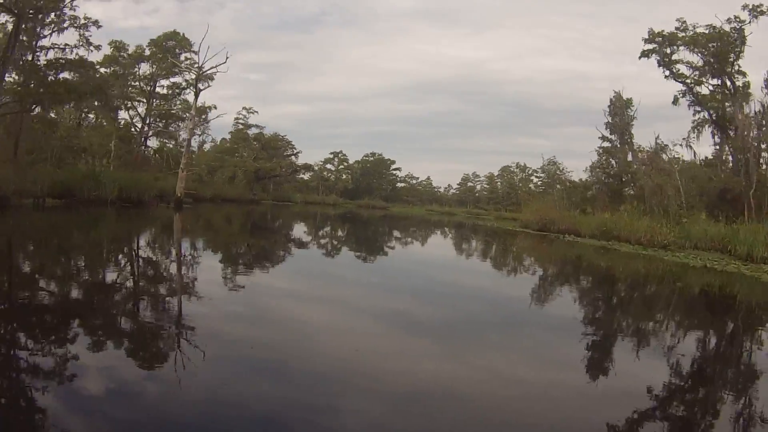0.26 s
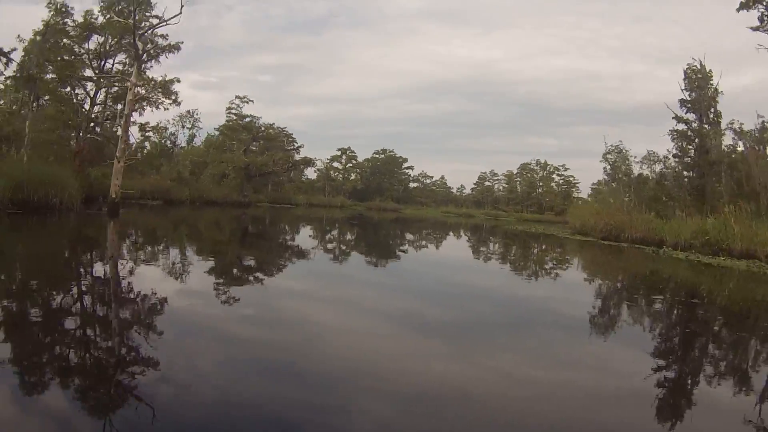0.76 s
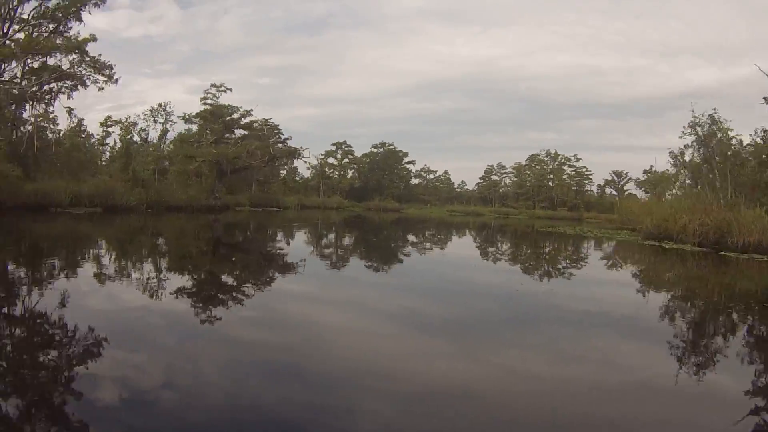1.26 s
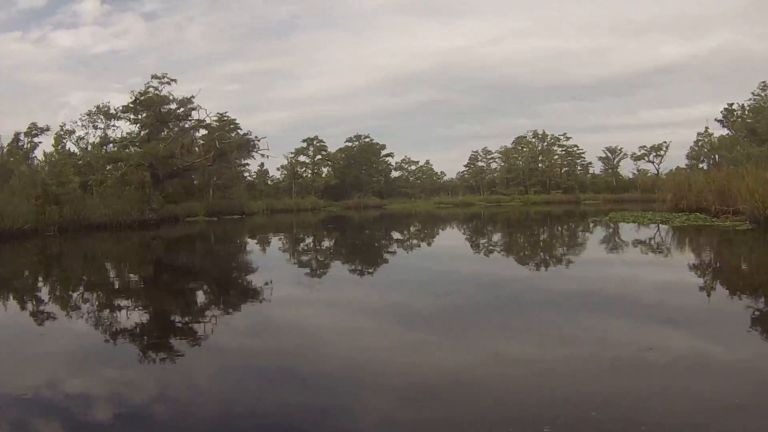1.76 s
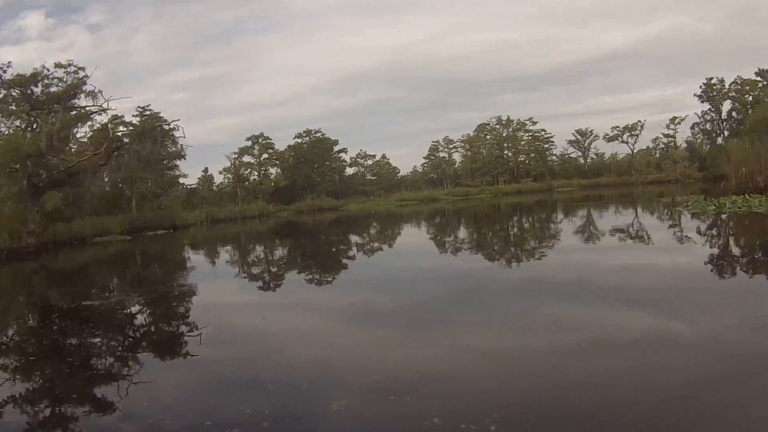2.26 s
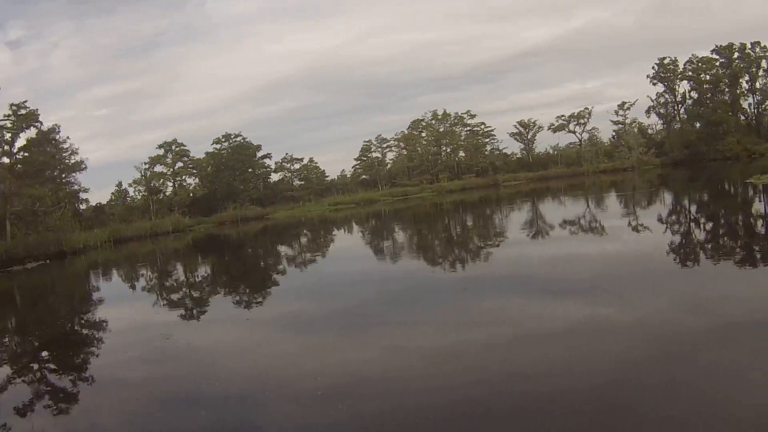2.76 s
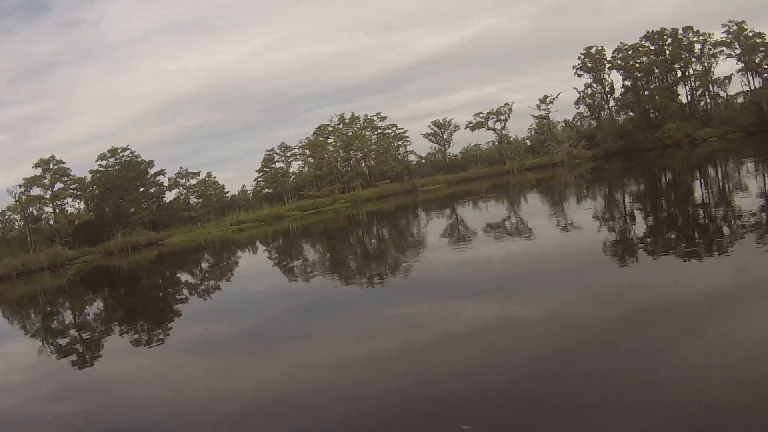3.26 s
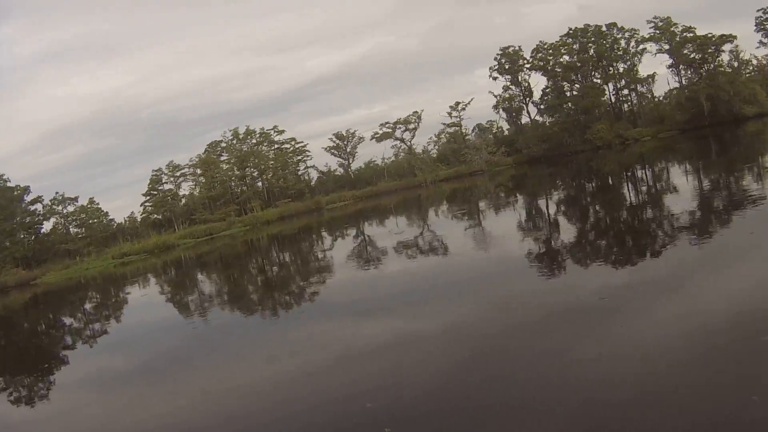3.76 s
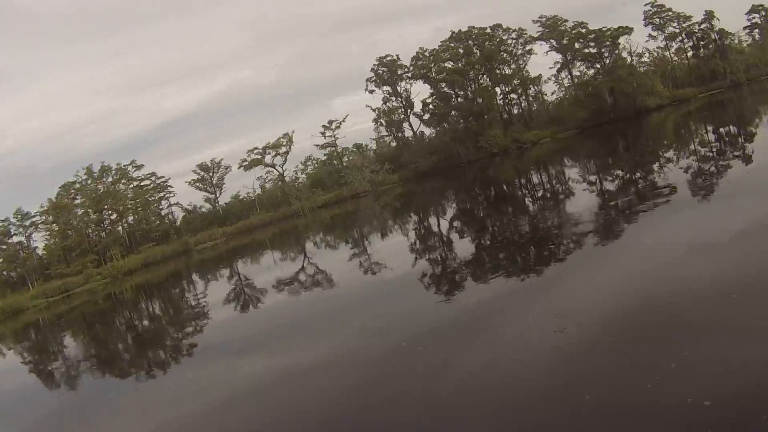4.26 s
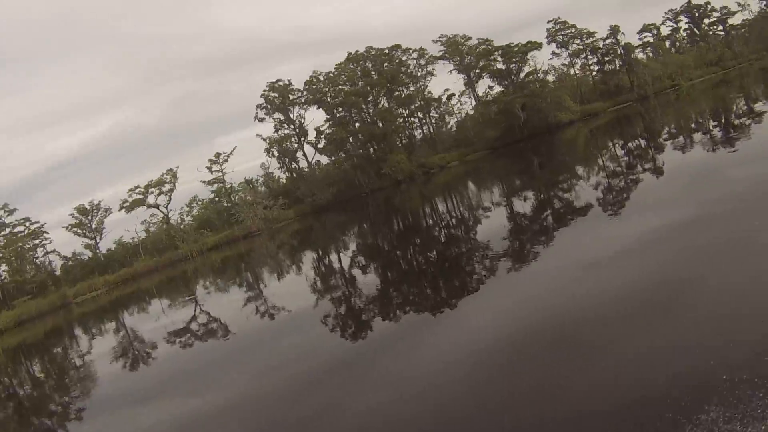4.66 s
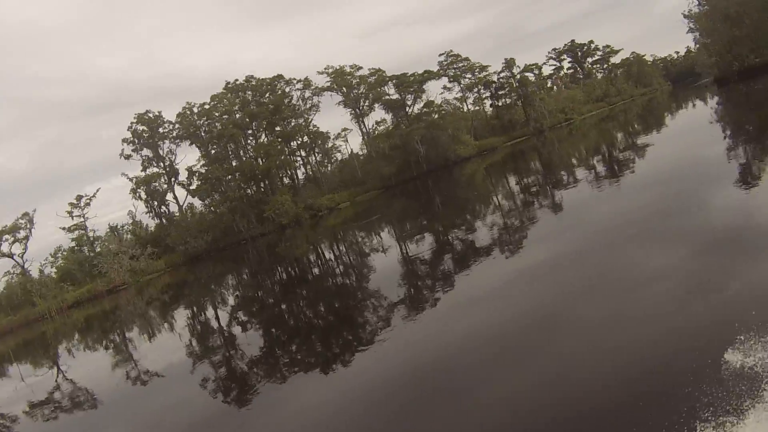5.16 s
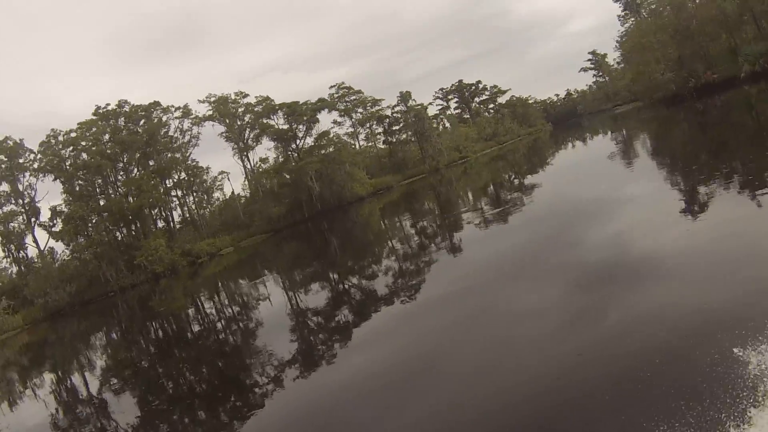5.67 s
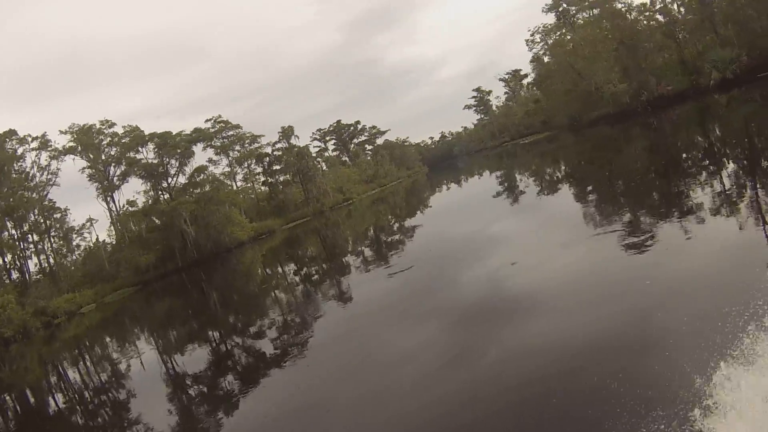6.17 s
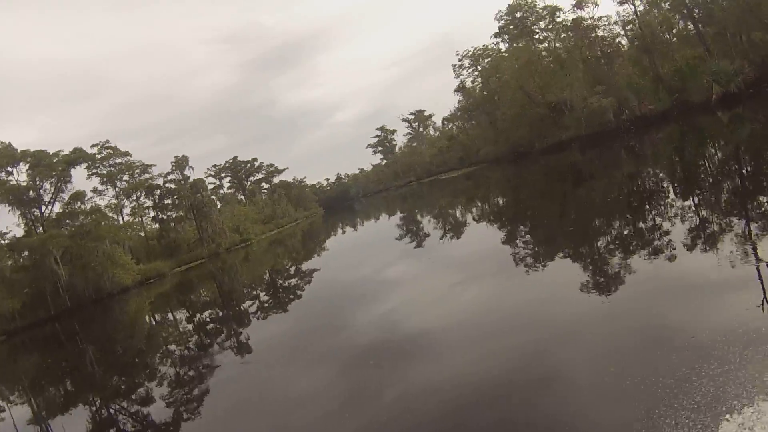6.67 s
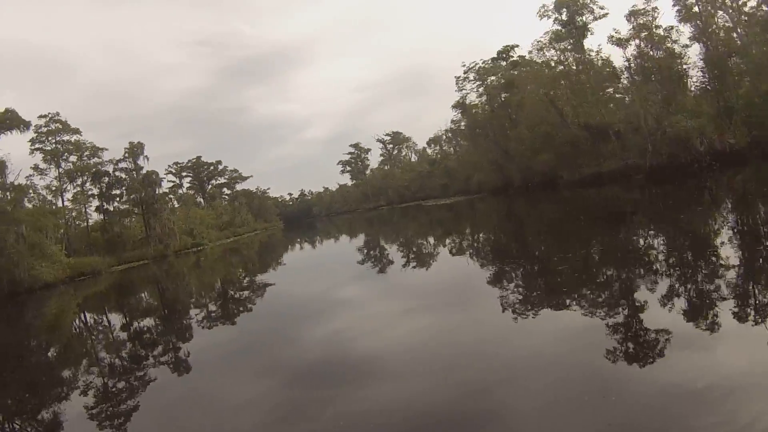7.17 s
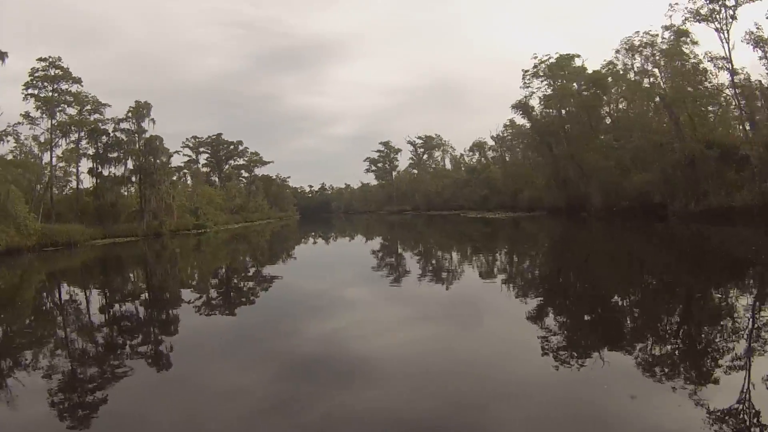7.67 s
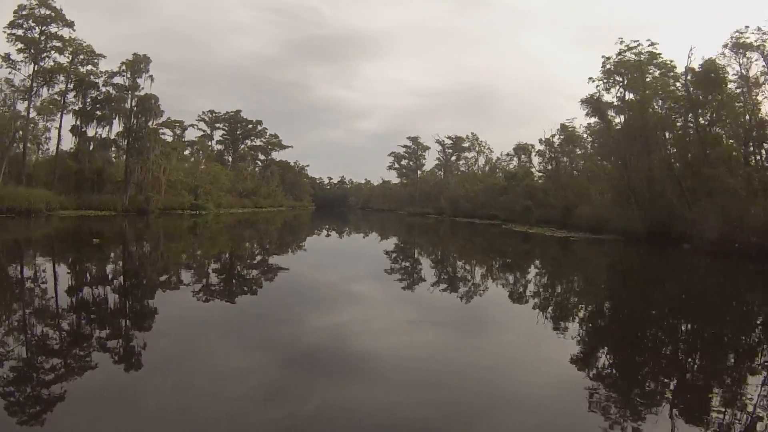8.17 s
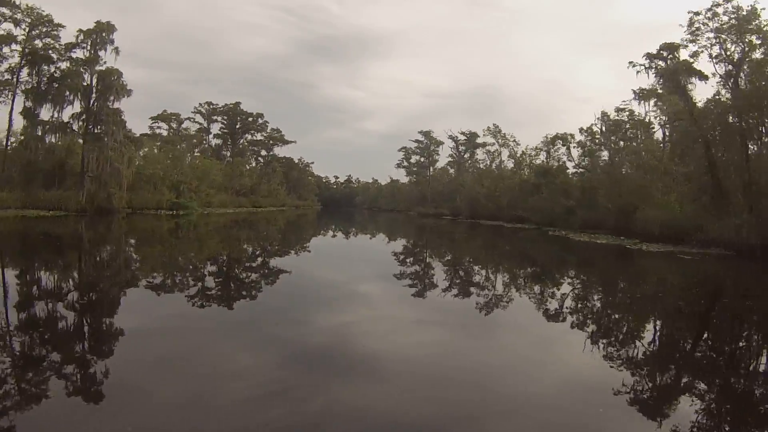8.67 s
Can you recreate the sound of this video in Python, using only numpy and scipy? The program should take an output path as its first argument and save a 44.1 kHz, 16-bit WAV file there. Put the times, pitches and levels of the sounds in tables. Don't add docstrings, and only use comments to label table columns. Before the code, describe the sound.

Close, boxy, muffled sound aboard a small open boat on calm water: a deep, throbbing outboard hum at nearly constant speed, slightly uneven, with a nasal mid-range rattle. Low water rush and light slaps run underneath. Fine hiss and spray build through a turn, strongest halfway, while sharp raps hit the cowl; later the water thins and faint high buzzes return.

```python
import sys
import numpy as np
from scipy import signal
from scipy.fft import rfft, irfft, next_fast_len
from scipy.io import wavfile
from scipy.ndimage import uniform_filter1d, minimum_filter1d

SR = 44100
rng = np.random.default_rng(int(sys.argv[2]) if len(sys.argv) > 2 else 0)


def generate_wav(sig):
    pcm = np.round(np.clip(np.atleast_2d(sig).T, -1, 1) * 32767).astype(np.int16)
    wavfile.write(sys.argv[1], SR, pcm)


def nominal_scale(level):
    x = np.asarray(level, float) / 20
    return 10 ** x


N = 393372
TIME = np.arange(N) / SR


def rms_one(x):
    return x / np.sqrt(np.mean(x ** 2) + 1e-20)


def in_time(rows):
    seconds, *columns = np.transpose(rows)
    return [np.interp(TIME, seconds, column) for column in columns]


def around(s, reach_s):
    return slice(max(int((s - reach_s) * SR), 0), int((s + reach_s) * SR))


def present(start, stop, fade_s, offset):
    return np.clip(np.minimum(TIME - start, stop - TIME) / fade_s + offset, 0, 1)


def drift(rate_hz):
    r = np.exp(-80 * np.pi * rate_hz / SR)
    draws = rng.standard_normal(N // 40 + 2002)
    slow = signal.lfilter([1], [1, -2 * r, r * r], draws)[2000:]
    return np.interp(np.arange(N) / 40, np.arange(len(slow)), rms_one(slow))


def colour(x, points):
    hz, level_db = np.transpose(points)
    size = next_fast_len(N)
    log_hz = np.log(np.arange(size // 2 + 1) * SR / size + 1)
    gain = nominal_scale(np.interp(log_hz, np.log(hz), level_db, left=-90, right=-120))
    return rms_one(irfft(rfft(x, size) * gain, size)[:N])


def resonate(x, hz, width_hz):
    r = np.exp(-np.pi * width_hz / SR)
    section = [(1 - r * r) / 2, 0, (r * r - 1) / 2, 1, -2 * r * np.cos(2 * np.pi * hz / SR), r * r]
    return signal.sosfilt([section, section], x + 1e-18)


def shaken(cycles, gate_db, grain_db):
    beat = np.cos(2 * np.pi * (cycles - .4)) + 0.27 * np.cos(np.pi * cycles) + 0.14 * np.cos(4 * np.pi * cycles)
    return rng.standard_normal(N) * nominal_scale(gate_db * beat + grain_db * drift(45))


def drone(cycles, level_db):
    # time in seconds, loss in dB, length in ms, phase slip in cycles.
    stumbles = [(0.051, 12, 36, 0.041), (0.206, 9, 40, 0.27), (0.498, 3.5, 75, -0.092),
                (0.975, 7.5, 38, 0.23), (1.504, 7, 38, 0.16), (1.666, 5, 31, 0.099), (1.118, 0.5, 55, 0.25),
                (2.118, 1, 115, -0.067), (2.467, 11, 55, 0.23), (2.666, 8, 32, 0.1), (2.821, 8, 35, 0.29),
                (2.949, 3.5, 93, -0.08), (3.197, 4.5, 45, -0.055), (3.465, 2, 56, 0.18),
                (4.922, 6, 26, -0.12), (4.488, 0.5, 20, -0.51), (4.603, 6.8, 20, 0.36),
                (4.729, 17, 24, 0.047), (5.103, 6, 25, -0.09), (5.39, 17.5, 16, 0.082),
                (5.8, 7.5, 54, 0.15), (6.307, 4, 57, 0.094), (6.607, 8, 35, -0.21), (6.95, 6, 29, 0.16),
                (7.192, 12, 23, -0.0078), (8.008, 18, 34, -0.1), (8.132, 9, 38, 0.14),
                (8.26, 3, 50, -0.097), (8.422, 13, 45, 0.12), (8.684, 4, 45, -0.015)]
    loss_db, slip = np.zeros(N), np.zeros(N)
    for s, depth_db, ms, turns in stumbles:
        near = around(s, reach_s=.2)
        late = (TIME[near] - s) / (max(ms, 5) / 1000)
        shape = np.exp(-(late / np.where(late < 0, .75, .45)) ** 2)
        loss_db[near] += depth_db * shape
        slip[near] += turns * shape / shape.sum()
    relax = np.exp(-1 / (.25 * SR))
    ahead = signal.lfilter([1], [1, -relax], slip) + 0.016 * drift(9)
    slight_db = 1.1 * np.maximum(drift(11), 0) ** 2
    height = np.sqrt(2) * nominal_scale(level_db - loss_db - slight_db + .75 * drift(1))
    return height * np.sin(2 * np.pi * (cycles + ahead))


def swelling(resting_db, spells):
    height = nominal_scale(resting_db)
    for start, stop, db in spells:
        height = height + nominal_scale(db) * present(start, stop, fade_s=.17, offset=.5)
    return height


def orders(cycles):
    # multiple of the firing rate, level in dB.
    steady_orders = [(.5, -47), (1.5, -41), (4, -44.5), (5, -52), (7, -50), (11, -46), (16, -52)]
    gear_orders = (2, 3, 6, 8, 9, 12)
    resting_levels = (-36, -33.5, -51, -44.5, -50, -45)
    # from and to in seconds, added dB.
    panel_spells = [
        [(1.6, 4.4, -37), (4.4, 7.9, -34)],
        [(.5, .72, -27), (1.1, 2.05, -31.5), (2.05, 2.35, -19), (2.35, 3.3, -22), (3.3, 4.25, -28),
         (6.0, 7.1, -35.5), (7.45, 7.95, -24.5), (7.95, 9.5, -19)],
        [(-1, 2.48, -44.5), (4.5, 5.8, -47), (7, 9.5, -46)],
        [(3.3, 4.5, -59), (4.5, 7.2, -39.5), (7.8, 9.5, -44.5)],
        [(-1, 0.87, -52), (-1, 1.1, -40.5), (2, 5.2, -35), (5, 7.8, -41.5)],
        [(1.5, 0.79, -41), (3, 4.8, -34), (5, 5.8, -26), (7, 9.5, -35)],
    ]
    heights = [(k, nominal_scale(db)) for k, db in steady_orders]
    for k, resting_db, spells in zip(gear_orders, resting_levels, panel_spells):
        heights.append((k, swelling(resting_db, spells)))
    uneven = .004 * drift(6)
    out = np.zeros(N)
    for k, height in heights:
        waver_db = np.sqrt(k) * .45 * drift(8.3)
        tone = np.sin(2 * np.pi * (k * (cycles + uneven) + rng.random()))
        out += np.sqrt(2) * height * nominal_scale(waver_db) * tone
    return out


def cowl(cycles, strain, slap_db):
    # frequency in Hz, density in dB per Hz.
    rattle_spectrum = [(400, -21.5), (545, -17.5), (600, -10), (655, -11.5), (700, -10), (776, -3.5),
                       (903, -6), (1000, -5.5), (1100, -4.5), (1220, -18), (1390, -13.5), (1900, -18.5),
                       (2370, -24.5), (3000, -28.5)]
    # frequency in Hz, width in Hz, level in dB.
    panel_modes = [(771.8, 70, -8.5), (820.5, 49, -7), (893.3, 30, -8.5), (953.3, 39, -7.5), (988, 53, -1),
                   (1068.5, 61, -8), (1386, 78, -20.5), (1925, 100, -22)]
    shake = shaken(cycles, gate_db=2.1, grain_db=0.77)
    panels = np.zeros(N)
    for hz, width_hz, db in panel_modes:
        panels += nominal_scale(db + 1.4 * drift(1.1)) * rms_one(resonate(shake, hz, width_hz))
    rattle = colour(shaken(cycles, gate_db=0.5, grain_db=0.5), rattle_spectrum)
    level_db = -26 + 5.5 * strain + slap_db + 0.89 * drift(10)
    return nominal_scale(level_db) * rms_one(rattle * nominal_scale(-0.5) + panels)


def rush(wet, strain, slap_db):
    # frequency in Hz, density in dB per Hz.
    rush_spectrum = [(22, -29.5), (42, -11), (55, -6), (72, 8.5), (100, 4), (135, 1.5), (190, -2.5),
                     (245, 2.5), (280, -4.5), (305, -9.5), (380, -14), (510, -13.5), (545, -27),
                     (700, -51.5)]
    surging = rng.standard_normal(N) * nominal_scale(2.3 * drift(3.7))
    level_db = -25.5 + 1.5 * strain + 0.5 * wet + 0.96 * slap_db
    return nominal_scale(level_db) * colour(surging, rush_spectrum)


def spray(cycles, wet, slap_db):
    # frequency in Hz, density in dB per Hz.
    spray_spectrum = [(2000, -30), (2450, -19), (2700, -15), (3160, -2.5), (3480, -8), (3770, -4.5),
                      (3940, -8.5), (4250, -18.5), (4700, -31)]
    level_db = -44.5 + 12.5 * wet + 0.9 * slap_db
    return nominal_scale(level_db) * colour(shaken(cycles, gate_db=0.0, grain_db=-1.0), spray_spectrum)


def hiss(cycles, wet, strain, slap_db):
    # frequency in Hz, density in dB per Hz.
    hiss_spectrum = [(4000, -19), (4500, 1), (5100, -5), (5680, 0), (6000, -5), (6500, -3), (6900, -6),
                     (7300, -14), (7950, -6), (8500, -9), (9300, -17), (10700, -11), (11800, -22),
                     (15200, -33)]
    wake_loss_db = 0.42 * TIME
    level_db = -56 + 8.5 * wet + strain - wake_loss_db + 0.93 * slap_db
    return nominal_scale(level_db) * colour(shaken(cycles, gate_db=0.7, grain_db=0.6), hiss_spectrum)


def singing(cycles):
    # frequency in Hz, width in Hz, from and to in seconds, level in dB.
    wall_modes = [
        (6650, 550, -1, 1.75, -59.5),
        (5560, 450, 7.9, 10, -61.5),
    ]
    out = np.zeros(N)
    for hz, width_hz, start, stop, db in wall_modes:
        height = nominal_scale(db + 1.5 * drift(4)) * present(start, stop, fade_s=.3, offset=0)
        out += height * rms_one(resonate(shaken(cycles, gate_db=.6, grain_db=1.2), hz, width_hz))
    return out


def ticks():
    # start in seconds, peak level in dB.
    mount_buzzes = [(0.0802, -62), (0.5856, -55), (0.7203, -61), (1.0201, -57), (1.1189, -60),
                    (1.2126, -64), (1.3204, -60), (1.3917, -60), (1.4202, -61), (1.7654, -59),
                    (2.0398, -58), (2.584, -62), (2.7721, -64), (7.3292, -63), (7.4789, -65), (7.6246, -68),
                    (7.894, -59), (8.0456, -62), (8.1499, -57), (8.2132, -66), (8.2886, -61), (8.3534, -64),
                    (8.4228, -58), (8.4931, -57), (8.5939, -59), (8.6283, -57), (8.7136, -58),
                    (8.7685, -59), (8.8054, -62), (8.8613, -64)]
    gain = np.zeros(N)
    for s, db in mount_buzzes:
        span = slice(int(s * SR), int(s * SR) + 4000)
        late = TIME[span] - s
        gain[span] += nominal_scale(db - 3) * np.exp(-late / .016) * (1 - np.exp(-late / .003))
    band = signal.butter(3, [12300, 14400], "band", fs=SR, output="sos")
    return gain * rms_one(signal.sosfilt(band, rng.standard_normal(N)))


def slaps():
    # centre in seconds, lift in dB, length in ms.
    hull_slaps = [(0.171, 1.5, 160), (.5, 3, 34), (0.596, 5.5, 58), (1.019, 6, 30), (1.18, 2, 57),
                  (1.32, 3, 27), (1.57, 5, 50), (1.72, 4.5, 74), (2.2, 3.5, 90), (2.518, 2.5, 43),
                  (2.689, 3.5, 82), (2.991, 2.5, 40), (3.25, 5.5, 41), (3.39, 4.5, 40), (3.491, 1, 25),
                  (3.661, 1.5, 35), (3.92, 0, 23), (4.139, 2, 40), (4.551, 1, 57), (5.301, 1.5, 50),
                  (5.65, 0.5, 35), (5.839, 1.5, 35), (6.101, 1.5, 49), (6.659, 4, 44), (6.94, 2.5, 72),
                  (7.381, 1.5, 69), (8.151, 4.5, 14), (8.302, 1.5, 15), (8.43, 2, 33), (8.741, 3, 90)]
    lift_db = np.zeros(N)
    for s, db, ms in hull_slaps:
        near = around(s, reach_s=.3)
        lift_db[near] += db * np.exp(-((TIME[near] - s) * 1000 / max(ms, 9)) ** 2)
    return lift_db


def knocks():
    # time in seconds, peak level in dB.
    hard_firings = [(0.545, -12), (0.881, -13), (1.42, -14), (1.473, -13), (2.037, -14), (3.937, -14),
                    (4.181, -13), (4.753, -8), (4.789, -9), (4.956, -9), (5.473, -9), (5.827, -9),
                    (5.891, -10), (6.091, -10), (6.832, -12), (7.22, -11), (7.472, -9), (8.145, -9),
                    (8.413, -11), (8.487, -13), (8.59, -12), (8.624, -11), (8.707, -9), (8.821, -12)]
    clicks = np.zeros(N)
    s, peak_db = np.transpose(hard_firings)
    clicks[(s * SR).astype(int)] = nominal_scale(peak_db + 42)
    return resonate(clicks, hz=987, width_hz=130) + .4 * resonate(clicks, hz=783, width_hz=110)


def scene():
    # time in seconds, firing rate in Hz, firing tone in dB.
    engine_run = [(0.0, 85.5, -11.5), (0.4, 83.9, -10.5), (0.8, 83.6, -10.5), (1.2, 83.5, -9.5),
                  (1.6, 83.9, -9), (2.0, 83.8, -12), (2.5, 84.5, -12.5), (3.0, 84.7, -13),
                  (3.3, 85.6, -14.5), (3.7, 85.65, -14), (4.4, 85.75, -12), (4.9, 85.5, -12),
                  (5.6, 86.15, -11), (6.4, 86.7, -10.5), (7.0, 87.1, -11.5), (7.5, 86.8, -12.5),
                  (8.1, 85.7, -12.5), (8.92, 85.75, -14.5)]
    # time in seconds, wetted bow 0-1, strain on the engine mount 0-1.
    turn_course = [(0.0, .1, 0.2), (1.4, .05, .05), (1.6, 0.1, 0), (1.9, .15, 0.1), (2.05, 0.4, 0.1),
                   (2.45, 0.2, .05), (3.1, 0.5, .05), (3.3, 0.6, 0.2), (3.75, 0.7, .05), (4.1, 0.72, 0.11),
                   (4.55, 0.93, 0.87), (5.1, .8, 0.7), (6.0, .45, .6), (6.25, 0.71, 0.87), (6.5, 0.4, 0.52),
                   (7.2, 0.36, 0.7), (7.95, 0.1, .65), (8.92, .05, 0.5)]
    rate_hz, drone_db = in_time(engine_run)
    cycles = np.cumsum(rate_hz) / SR
    wet, strain = in_time(turn_course)
    slap_db = slaps() + .45 * drift(14)
    engine = drone(cycles, drone_db) + orders(cycles) + cowl(cycles, strain, slap_db) + knocks()
    water = rush(wet, strain, slap_db) + spray(cycles, wet, slap_db) + hiss(cycles, wet, strain, slap_db)
    housing = singing(cycles) + ticks()
    return (engine + water + housing)[None]


def low_pass(x):
    return signal.sosfilt(signal.butter(12, 15140, fs=SR, output="sos"), x)


def record(dry):
    over_db = np.maximum(20 * np.log10(np.abs(dry[0]) + 1e-6) + 3.8, 0)
    held_db = minimum_filter1d(-.55 * over_db, size=601)
    gain_db = uniform_filter1d(held_db, size=601)
    return low_pass(dry * nominal_scale(gain_db))


dry = scene()
out = record(dry)
generate_wav(out)
```